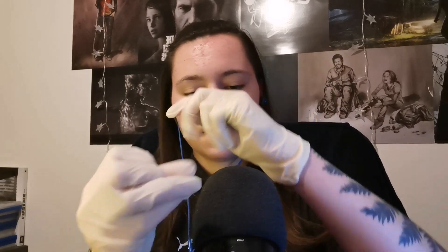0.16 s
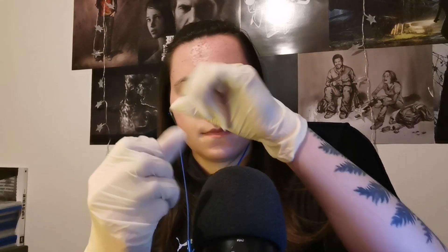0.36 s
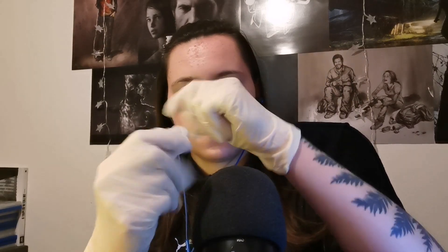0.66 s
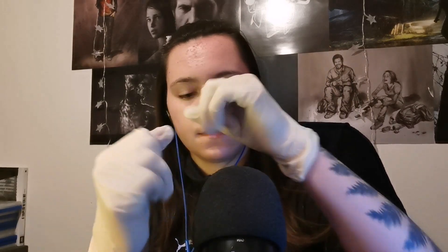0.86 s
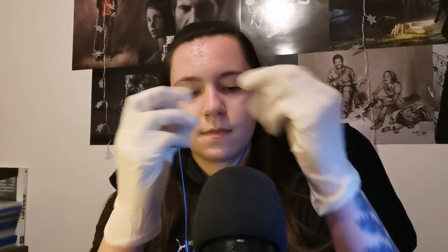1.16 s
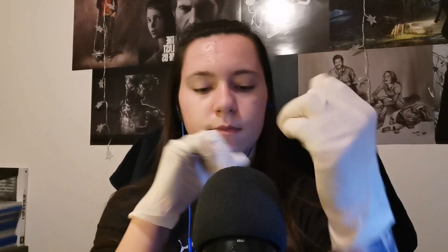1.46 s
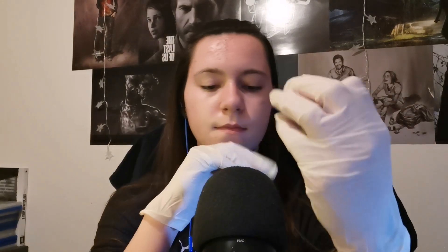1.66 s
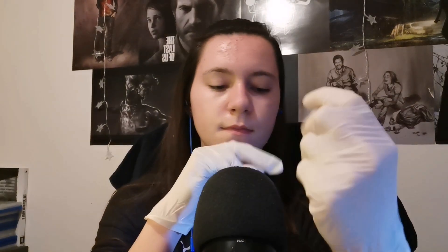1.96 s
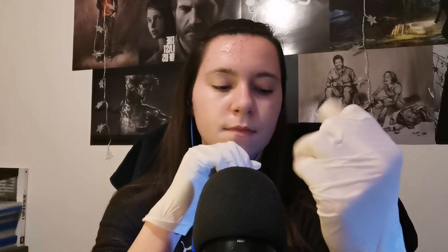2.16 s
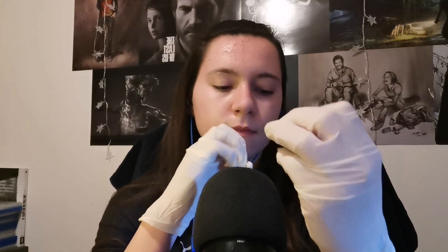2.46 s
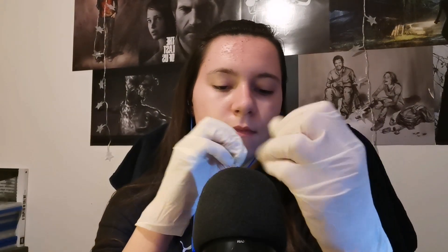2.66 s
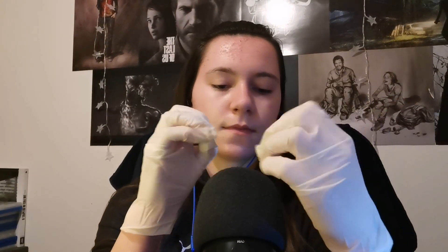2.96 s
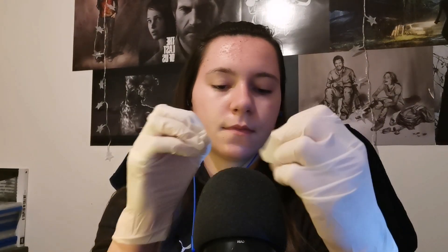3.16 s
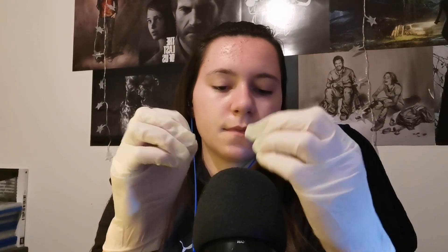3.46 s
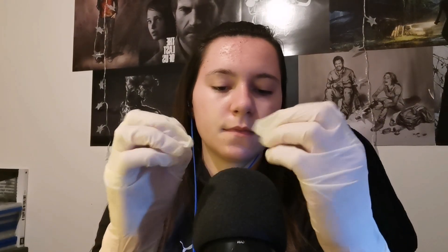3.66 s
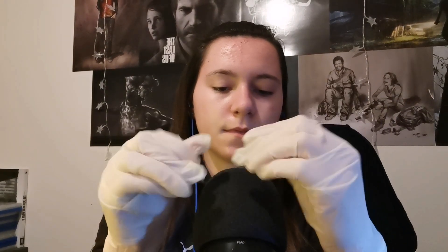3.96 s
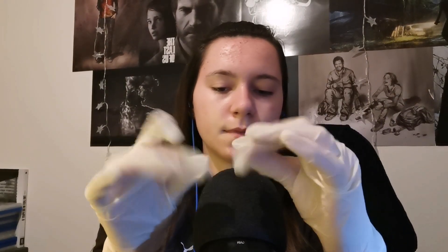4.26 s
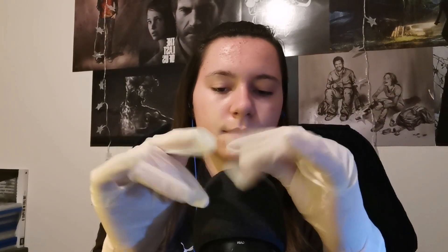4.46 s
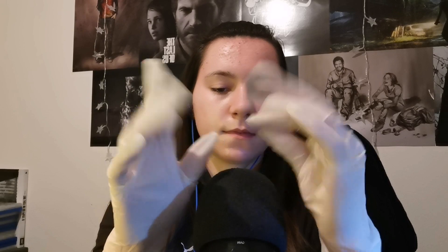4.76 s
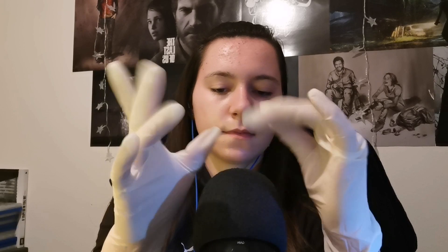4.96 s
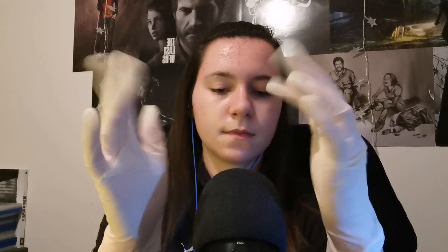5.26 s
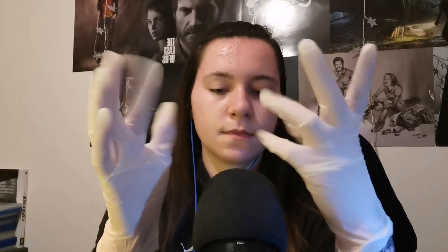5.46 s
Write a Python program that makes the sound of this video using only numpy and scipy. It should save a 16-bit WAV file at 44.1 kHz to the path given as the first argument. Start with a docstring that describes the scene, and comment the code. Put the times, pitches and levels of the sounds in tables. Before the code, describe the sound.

Two hands in thin disposable gloves move very close to a stereo microphone in a small, nearly dry room. From the start, fingers rub in quick, uneven strokes that hiss and crinkle, with small snaps of sticking rubber. Soft low thumps come through the first 1.4 seconds over a faint rumble. The rubbing continues, with a sharper snap at about 1.8 seconds and a light slap near 2.6. From about 2.8 to 4 seconds the rubbing is quieter, leaving scattered crackles, dull flaps and a run of low thumps, strongest around 3.6. From 4 seconds the strokes turn short and brisk. Between about 4.4 and 5.2 seconds the fingers flick, loose rubber slaps and snaps repeatedly, slightly to the left, and the rumble of stirred air swells, with a firm thump near 4.5. The rumble eases as a few last flicks sound up to 5.6 seconds.

```python
"""Thin gloves at a microphone

Two hands in disposable gloves rub, pinch and flick their fingers just above a stereo desk microphone
in a small room. Sliding rubber hisses and crinkles, stuck folds let go with snaps, slack rubber flaps
and slaps, and the moving fingers push soft thumps and a low rumble into the microphone."""
import sys
import numpy as np
from scipy import signal
from scipy.fft import rfft, irfft, next_fast_len
from scipy.io import wavfile
from scipy.ndimage import uniform_filter1d

SR = 44100
rng = np.random.default_rng(int(sys.argv[2]) if len(sys.argv) > 2 else 0)


def persist_wave(psi):
    """Save psi, clipped to +-1, as 16-bit WAV."""
    counts = np.round(np.clip(psi, -1, 1) * 32767).astype(np.int16)
    wavfile.write(sys.argv[1], SR, np.atleast_2d(counts).T)


N = 247386
TIME = np.arange(N) / SR

# How the hands are held: time_s, bright_db, slack_db, left_db
HAND_GRIP = [(0.0, -1, -9, -0.5), (0.5, 1.5, -4, -0.5), (0.9, -0.5, 0, -1), (1.5, 1, -9.5, -1.5),
             (2.3, -2, -5, 3), (2.75, 3, -0.5, -3.5), (3.2, -0.5, 5.5, -2), (4.6, 0.5, 6, 4),
             (5.15, -5, 0.5, 5.5), (5.61, -1.5, -5.5, -1)]


def from_db(db):
    """Decibels to gain."""
    return 10 ** (np.asarray(db) / 20)


def unit_rms(x):
    """Scale to unit power."""
    return x / np.sqrt(np.mean(x ** 2) + 1e-20)


def curves(rows):
    """Each column after time_s, interpolated to every sample."""
    time_s, *columns = np.transpose(rows)
    return [np.interp(TIME, time_s, column) for column in columns]


def panned(left_db):
    """Constant-power gains, left over right by left_db."""
    gains = from_db(np.array([[.5], [-.5]]) * left_db)
    return gains / np.sqrt(np.mean(gains ** 2, axis=0))


def drift(rate_hz):
    """Random curve of unit power, rate_hz knots a second."""
    knots = rng.standard_normal(8192)
    return unit_rms(np.interp(TIME * rate_hz, np.arange(len(knots)), knots))


def low_pass(x, hz):
    """First-order roll-off."""
    return signal.sosfilt(signal.butter(1, hz, fs=SR, output="sos"), x)


def resonance(x, hz, width_hz):
    """Two-pole band-pass, unit peak gain."""
    r = np.exp(-np.pi * abs(width_hz) / SR)
    feedback = [1, -2 * r * np.cos(2 * np.pi * hz / SR), r * r]
    return signal.lfilter(np.array([1, 0, -1]) * (1 - r * r) / 2, feedback, x + 1e-18)


def moving_resonance(x, hz, width_hz):
    """Band-pass that follows hz: shift to zero, smooth, shift back."""
    carrier = np.exp(2j * np.pi * np.cumsum(hz) / SR)
    return 2 * np.real(low_pass(x / carrier, hz=width_hz / 2) * carrier)


def coloured(x, spectrum):
    """Minimum-phase filter of unit power gain; falls 20 dB an octave beyond the spectrum's ends."""
    size = next_fast_len(N + SR // 2)
    size += size % 2
    octave = np.log2(np.maximum(np.fft.rfftfreq(size, 1 / SR), 1))
    knot_hz, knot_db = np.transpose(spectrum)
    knots = np.log2(knot_hz)
    beyond = np.abs(octave - np.clip(octave, knots[0], knots[-1]))
    gain = unit_rms(from_db(np.interp(octave, knots, knot_db) - 20 * beyond))
    cepstrum = irfft(np.log(gain))[:size // 2]
    cepstrum[1:] *= 2
    return irfft(rfft(x, size) * np.exp(rfft(cepstrum, size)))[..., :N]


def room(x, t60_s):
    """Dense, decaying reflections from nearby walls, different on each side."""
    t = TIME[:SR // 2]
    tail = low_pass(rng.standard_normal((2, len(t))) * from_db(-60 * t / t60_s), hz=7100)
    return signal.fftconvolve(x, tail / np.sqrt(np.sum(tail ** 2) / 2), axes=1)[:, :N]


def air_rumble(friction_db, gain_db, lump_db, stroke_share, gesture_s, lean_db):
    """Moving hands stir a lumpy rumble at the microphone that swells with each stroke."""
    # Stirred air, more as the hands close in and flick: time_s, level_db
    motion = [(0.0, -36.5), (2.5, -35), (3.85, -32.5), (4.4, -22.5), (5.05, -21.5), (5.61, -32)]
    # Rumble colour: freq_hz, level_db
    spectrum = [(18, 5.5), (52, 2), (74, 6.5), (95, -6), (150, -7.5), (260, -35)]
    motion_db, = curves(motion)
    *_, left_db = curves(HAND_GRIP)
    swing_db = friction_db - uniform_filter1d(friction_db, size=int(gesture_s * SR))
    air = coloured(rng.standard_normal((2, N)), spectrum)
    air /= np.sqrt(uniform_filter1d(np.mean(air ** 2, axis=0), size=SR // 16))
    level_db = motion_db + stroke_share * swing_db + gain_db + lump_db * drift(20)
    return air * from_db(level_db) * panned(left_db + lean_db)


def finger_thumps(gain_db, push_s, push_hz, flesh_hz, left_db):
    """Fingers bump: a soft, uneven push leaves a low boom; the flesh passes nothing sharp."""
    # Bumps: start_s, level_db
    bumps = [(0.02, -19), (0.118, -9.5), (0.234, -26), (0.376, -23), (0.79, -17), (0.989, -18.5),
             (1.103, -16.5), (1.23, -24), (1.353, -20), (2.896, -17), (3.048, -12), (3.186, -28),
             (3.385, -15), (3.48, -10), (3.62, -6), (3.797, -12), (3.96, -18.5), (4.17, -16),
             (4.265, -14.5), (4.472, -5.5), (4.64, -13.5), (4.89, -16), (4.983, -16), (5.2, -16),
             (5.374, -15)]
    # Ringing after a bump: pitch_hz, width_hz, level_db
    modes = [(74.1, 14.5, 4.5), (116.6, 13.3, -11)]
    out, t = np.zeros((2, N + SR)), TIME[:SR // 2]
    for start_s, level_db in bumps:
        roughness = rng.standard_normal(len(t)) + rng.standard_normal((2, len(t)))
        push = t * np.exp(-t / push_s) * roughness
        ring = sum(from_db(db) * resonance(push, hz, width_hz) for hz, width_hz, db in modes)
        boom = low_pass(ring, push_hz)
        start = int(start_s * SR)
        out[:, start:start + len(t)] += boom / np.abs(boom).max() * from_db(level_db + gain_db)
    flesh = signal.butter(4, flesh_hz, fs=SR, output="sos")
    return signal.sosfilt(flesh, out[:, :N] + 1e-18) * panned(left_db)


def rubber_slaps(gain_db, flutter_db, flutter_ms, q, left_db):
    """Slack rubber slaps a finger: one push and a brief flutter ring the trapped air."""
    # Slaps: start_s, level_db, pitch_hz
    slaps = [(2.566, -21, 1100), (2.888, -28, 390), (3.062, -22.5, 387), (3.476, -26.5, 250),
             (3.62, -29, 304), (3.645, -27, 328), (4.392, -26, 404), (4.479, -18.5, 192), (4.519, -19, 232),
             (4.659, -15, 245), (4.735, -14.5, 256), (4.891, -15.5, 296), (5.129, -19, 640),
             (5.374, -24.5, 298), (5.564, -19.5, 556)]
    out, t = np.zeros((2, N + SR)), TIME[:SR // 10]
    for start_s, level_db, hz in slaps:
        force = from_db(flutter_db) * np.exp(-1000 * t / flutter_ms) * rng.standard_normal((2, len(t)))
        force[:, 0] += 1
        pop = low_pass(resonance(force, hz, hz / q), hz)
        start = int(start_s * SR)
        out[:, start:start + len(t)] += pop / np.abs(pop).max() * from_db(level_db + gain_db)
    return out[:, :N] * panned(left_db)


def finger_pockets(x):
    """Air pockets between the fingers add short rings."""
    # Pockets: pitch_hz, width_hz, level_db
    pockets = [(3330, 220, -16), (5370, 150, -14)]
    return x + sum(from_db(db + 7.5) * resonance(x, hz, width_hz) for hz, width_hz, db in pockets)


def fold_snaps(gain_db, peel_db, slips_per_s, creep_share, crack_db, q, lag_ms):
    """Stuck folds let go and ring: short ones in one crack, long ones creep and peel in a run of slips."""
    # Folds letting go: time_s, level_db, pitch_hz, peel_ms, left_db
    folds = [(0.056, -24.5, 2170, 0.71, 6), (0.1057, -17, 1860, 0.89, 2), (0.12, -21.5, 2670, 2.2, 5),
             (0.7361, -20, 4000, 1.1, -10), (1.109, -20, 1680, 2, -5), (1.141, -16.5, 2380, 2.6, 2),
             (1.186, -23.5, 7200, 0.63, -17), (1.8297, -12.5, 3170, 2.04, 4.5),
             (2.2086, -21.5, 2600, 0.61, 2), (2.417, -24.5, 4500, 1.2, 7), (2.566, -22, 1980, 2.4, -4),
             (2.643, -24, 2900, 6.8, 5), (2.782, -25, 5300, 2, -2), (2.8903, -21, 4840, 6.7, 5),
             (2.938, -30, 4050, 2.4, 15), (3.027, -28, 1430, 4.3, -7), (3.058, -19.5, 5400, 4.2, 6),
             (3.216, -34.5, 4000, 0.51, -8), (3.26, -34.5, 1550, 1.7, 7), (3.36, -21, 3170, 4.3, 4),
             (3.478, -31.5, 5500, 4.2, 7), (3.513, -27.5, 2230, 7.4, -13), (3.619, -24, 5500, 2.9, 4),
             (3.804, -25.5, 6400, 4.4, 3), (3.818, -24, 5260, 5, -4), (4.396, -23, 4970, 7.8, 7),
             (4.637, -21, 3280, 3.9, 9), (4.735, -19.5, 1370, 5.2, 4), (4.893, -18.5, 3000, 4.9, 5),
             (5.099, -25.5, 2500, 3.4, 9), (5.131, -14.5, 2960, 10, 13), (5.196, -19.5, 2920, 2.6, 4),
             (5.228, -22.5, 2360, 6, 1), (5.375, -17.5, 2300, 6.7, 0), (5.466, -25.5, 2860, 3, 16),
             (5.563, -20.5, 3000, 1, 16), (5.5749, -22.5, 2250, 4, 15)]
    # Snap colour: freq_hz, level_db
    spectrum = [(150, 5.5), (1100, 10.5), (6000, 9), (9500, 0), (15000, -6)]
    out, lead = np.zeros((2, N + SR)), SR // 20
    t_ms = np.arange(-lead, lead) * 1000 / SR
    for time_s, level_db, hz, peel_ms, left_db in folds:
        peel = np.exp(-(t_ms / np.where(t_ms < 0, creep_share * peel_ms, peel_ms)) ** 2)
        force = from_db(peel_db) * peel_ms * peel * rng.standard_normal((2, len(t_ms)))
        force *= rng.random(len(t_ms)) < slips_per_s / SR
        force[0, lead] += 1
        force[1, lead + int(lag_ms * SR / 1000)] += 1
        ring = unit_rms(resonance(force, hz, hz / q))
        crack = from_db(crack_db) * unit_rms(low_pass(force, 2 * hz))
        snap = unit_rms(ring + crack) * from_db(level_db + gain_db)
        start = int(time_s * SR)
        out[:, start:start + 2 * lead] += snap * panned(left_db)
    return coloured(finger_pockets(out[:, lead:lead + N]), spectrum)


def stroke_friction_db(attack_s, release_s, resting_db):
    """Each stroke grips, holds while the finger slides and dies away; powers add."""
    # Finger sliding over finger: start_s, length_s, level_db
    strokes = [(0.0, .27, -34.5), (0.328, 0.079, -32.5), (0.418, 0.3, -38.5), (0.755, 0.36, -32.5),
               (1.219, 0.035, -37), (1.342, 0.15, -39), (1.428, 0.14, -32.5), (1.607, 0.048, -31.5),
               (1.691, 0.26, -38.5), (2, 0.03, -35), (2.072, 0.25, -40.5), (2.152, 0.037, -30),
               (2.382, 0.28, -38), (2.745, 0.031, -38.5), (2.833, 0.13, -45.5), (3.064, 0.0064, -33.5),
               (3.167, 0.13, -47), (3.367, 0.044, -42.5), (3.466, 0.2, -45), (3.811, 0.028, -40.5),
               (3.962, 0.073, -43.5), (4.083, 0.085, -34.5), (4.214, 0.095, -38), (4.395, 0.033, -36.5),
               (4.478, 0.079, -37), (4.629, 0.079, -33.5), (4.722, 0.1, -35), (4.894, 0.13, -30.5),
               (5.082, 0.065, -33.5), (5.219, 0.022, -28.5), (5.386, 0.039, -31.5), (5.436, 0.13, -40.5),
               (5.583, 0.018, -31)]
    power = from_db(resting_db) ** 2
    for start_s, length_s, level_db in strokes:
        t = TIME - start_s
        envelope = np.exp(np.minimum(t, 0) / attack_s - np.maximum(t - length_s, 0) / release_s)
        power = power + (envelope * from_db(level_db)) ** 2
    return 10 * np.log10(power)


def slips(per_s, spread_db, scatter_db, lag_ms, phase_bias):
    """Random uneven clicks, each reaching the two capsules with its own balance, delay and polarity."""
    at = np.flatnonzero(rng.random(N) < per_s / SR)
    size = from_db(spread_db * np.minimum(rng.exponential(1, N), 4))[at]
    size *= rng.choice([-1, 1], N)[at]
    place, lag, facing = rng.standard_normal((3, N))[:, at]
    left, right = size * panned(scatter_db * place)
    delay = np.round((1 + lag / 2) * lag_ms * SR / 1000).astype(int)
    out = np.zeros((2, N))
    out[0, at] = left
    out[1, (at + delay) % N] = right * np.sign(facing + phase_bias)
    return unit_rms(out)


def wrinkles(patches_hz, per_s, cluster_db):
    """Wrinkles give way in clusters, each ticking in one patch of rubber."""
    rate_hz = per_s * from_db(cluster_db * drift(25))
    crinkle = np.zeros((2, N))
    for hz in patches_hz:
        ticks = slips(rate_hz, spread_db=3.5, scatter_db=-1.0, lag_ms=0.13, phase_bias=0.81)
        crinkle += resonance(ticks, hz, hz / 2)
    return unit_rms(crinkle)


def rubbing(friction_db, hiss_db, crinkle_db, stickiness, flap_db, judder_db, shimmer_db, palm_db):
    """Countless tiny slips hiss, rarer big ones crinkle, slack rubber flaps in dull pulses."""
    # Hollow between fingers and palm, rising as the hand opens: time_s, pitch_hz
    palm = [(0.0, 1930), (1.55, 2080), (1.8, 2400), (2.75, 1830), (3.5, 1560), (4.3, 2000), (5.61, 2360)]
    # Sliding rubber: freq_hz, level_db
    slide_spectrum = [(430, -22.5), (690, 2.5), (1050, -8), (1450, -8.5), (1900, -13), (2500, -10),
                      (3500, -4.5), (5500, -2.5), (7500, -6.5), (10000, -14.5), (14800, -13), (15600, -55)]
    # Flapping rubber: freq_hz, level_db
    flap_spectrum = [(90, -3.5), (250, -3), (400, -9.5), (1100, -24.5)]
    bright_db, slack_db, left_db = curves(HAND_GRIP)
    palm_hz, = curves(palm)
    hiss = slips(per_s=9000, spread_db=2.0, scatter_db=6.0, lag_ms=0.12, phase_bias=2)
    # The grip tightens and gives.
    hiss += low_pass(hiss * (from_db(judder_db * drift(130)) - 1), hz=4100)
    # Stretched patches come and go, each with its own pitch.
    patches_hz = np.geomspace(1400, 7000, num=9)
    hiss += sum(from_db(shimmer_db + 5.4 * drift(15)) * resonance(hiss, hz, hz / 6) for hz in patches_hz)
    # Slow fingers stick more, so weak strokes crinkle more.
    stick_db = stickiness * (friction_db.mean() - friction_db)
    slide = hiss + from_db(crinkle_db + stick_db) * wrinkles(patches_hz, per_s=70, cluster_db=7)
    slide += from_db(palm_db) * moving_resonance(slide, palm_hz, width_hz=480)
    slide = unit_rms(coloured(finger_pockets(slide), slide_spectrum))
    dull = low_pass(slide, hz=3420)
    slide = dull * from_db(-bright_db / 2) + (slide - dull) * from_db(bright_db)
    pulses = slips(per_s=650, spread_db=3.5, scatter_db=4.5, lag_ms=0.24, phase_bias=0.3)
    flaps = from_db(slack_db + flap_db) * unit_rms(coloured(pulses, flap_spectrum))
    return (from_db(hiss_db) * slide + flaps) * from_db(friction_db) * panned(left_db)


def scene():
    """Close gloves with a little room, over dry rumble and thumps."""
    friction_db = stroke_friction_db(attack_s=0.023, release_s=0.02, resting_db=-57)
    gloves = rubbing(friction_db, hiss_db=-5.5, crinkle_db=-2.5, stickiness=0.15, flap_db=-4.5,
                     judder_db=5.0, shimmer_db=-5, palm_db=14)
    gloves += fold_snaps(gain_db=-26.0, peel_db=-13, slips_per_s=3500, creep_share=0.58,
                         crack_db=-3.5, q=3.4, lag_ms=0.07)
    gloves += rubber_slaps(gain_db=2.0, flutter_db=-13.0, flutter_ms=2.54, q=1.68, left_db=6.5)
    rumble = air_rumble(friction_db, gain_db=3, lump_db=3, stroke_share=0.39, gesture_s=0.73, lean_db=-2)
    thumps = finger_thumps(gain_db=0.5, push_s=0.0046, push_hz=174, flesh_hz=210, left_db=1.0)
    return gloves + from_db(-11.0) * room(gloves, t60_s=0.13) + rumble + thumps


def record(dry):
    """Steep treble cut."""
    cutoff_hz = 15600
    return signal.sosfilt(signal.ellip(10, .1, 80, cutoff_hz, fs=SR, output="sos"), dry)


dry = scene()
out = record(dry)
persist_wave(out)
```